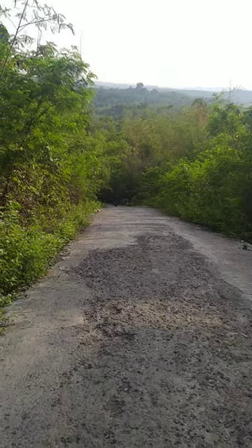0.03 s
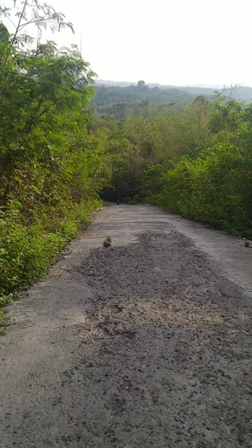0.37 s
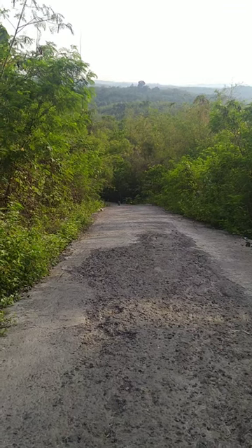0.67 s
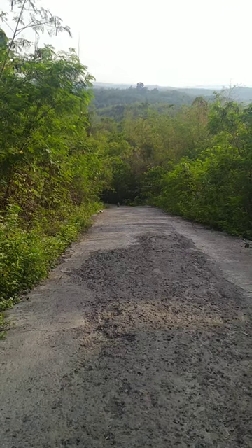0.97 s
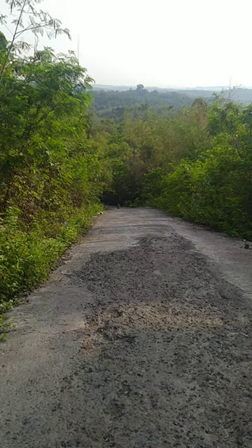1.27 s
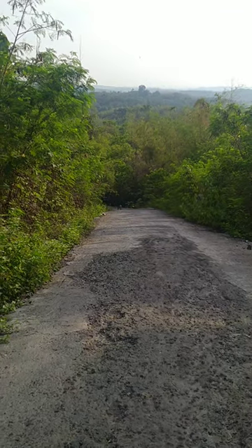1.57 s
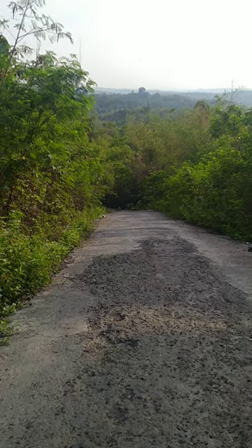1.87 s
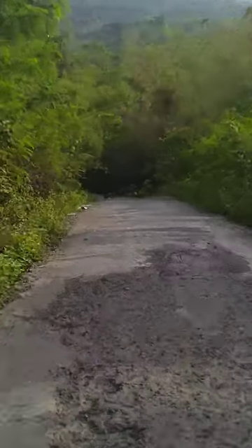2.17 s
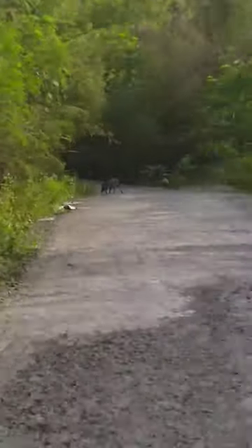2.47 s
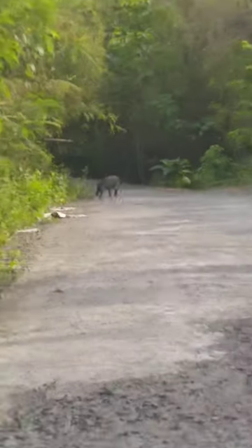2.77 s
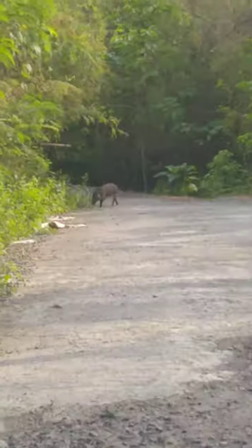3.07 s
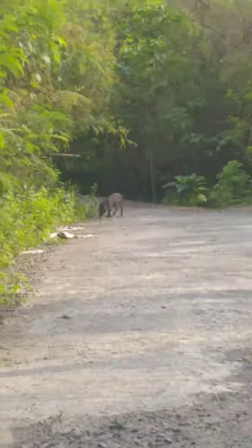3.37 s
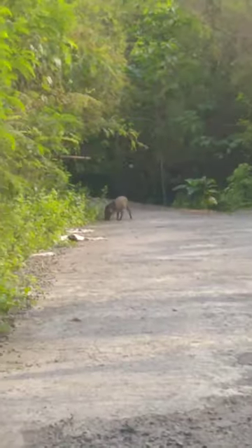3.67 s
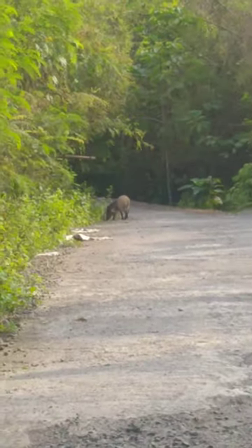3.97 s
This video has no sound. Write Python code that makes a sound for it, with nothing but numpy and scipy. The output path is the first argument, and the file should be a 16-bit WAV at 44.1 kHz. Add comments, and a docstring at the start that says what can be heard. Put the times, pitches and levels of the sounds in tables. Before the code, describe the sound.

Insects trill and small birds chirp over a low engine throb, with a few handling knocks.

```python
"""Insects and birds on a country lane

Insects trill with quick wing strokes, small birds chirp and whistle, and bushes and trees echo them.
A muffled low throb, probably an idling engine, runs underneath, with a soft hiss of distant air.
Fingers knock on the phone and make its case ring, rub it lightly and slide over it near the end."""
import sys
import numpy as np
from scipy import signal
from scipy.fft import rfft, irfft
from scipy.io import wavfile

SR = 44100
rng = np.random.default_rng(int(sys.argv[2]) if len(sys.argv) > 2 else 0)


def wav_out(sig):
    """Save sig, one row per channel (or a flat mono array), as 16-bit PCM at SR to the path in sys.argv[1]."""
    wavfile.write(sys.argv[1], SR, np.round(np.clip(np.atleast_2d(sig).T, -1, 1) * 32767).astype(np.int16))


N = 176400  # 4 seconds

# runs of insect wing strokes: start_s, end_s, period_s, pitch_hz, stroke_s, fall_hz, level_db
TRILLS = [(0.199, .71, .0778, 5660, 0.023, 320, -50.5), (0.898, 1.1, .0768, 5690, 0.033, 320, -50.5),
          (1.138, 1.64, 0.072, 5650, 0.032, 324, -57.5), (1.911, 2.5, 0.073, 5645, 0.028, 317, -57),
          (2.606, 2.96, .076, 5640, 0.031, 316, -53.5), (3.15, 3.8, 0.077, 5650, 0.022, 320, -52.5),
          (0.051, .56, .08, 5510, 0.059, 60, -62), (0.608, 1.32, .0803, 5458, 0.054, 25, -52),
          (1.335, 1.62, .0803, 5450, 0.068, 70, -64), (1.65, 2.36, .0803, 5445, 0.047, 25, -52),
          (2.694, 3.48, .0805, 5442, 0.047, 25, -54), (3.82, 4, 0.087, 5520, 0.037, 60, -56),
          (1.926, 2.42, 0.074, 6470, .014, 200, -59.5), (2.631, 2.96, 0.059, 6540, 0.015, 200, -62)]
# high bird chirps: middle_s, pitch_hz, level_db
CHIRPS = [(0.027, 4400, -54), (0.146, 4300, -56), (0.274, 4410, -50.5), (.307, 4640, -53.5),
          (0.469, 4500, -55), (0.531, 4320, -49), (.581, 4325, -54), (0.638, 4230, -55.5),
          (.725, 4370, -54), (1.005, 4310, -54), (1.116, 4280, -53.5), (1.146, 4730, -49.5),
          (1.25, 4700, -52.5), (1.28, 4500, -51), (1.368, 4560, -53), (1.399, 4500, -52),
          (1.543, 4320, -53.5), (1.58, 4500, -49.5), (1.827, 4420, -52), (1.889, 4520, -53),
          (1.954, 4327, -53), (2.08, 4286, -64), (2.231, 4287, -54), (2.333, 4490, -49.5),
          (2.392, 4500, -57), (2.534, 4380, -54), (2.643, 4250, -50.5), (2.718, 4750, -51.5),
          (3.026, 4500, -56.5), (3.061, 4300, -54.5), (3.13, 4200, -59), (3.187, 4320, -56.5),
          (3.251, 4300, -57), (3.272, 4320, -55), (3.374, 4400, -54), (3.392, 4555, -49.5),
          (3.488, 4540, -47), (3.603, 4514, -62), (3.725, 4474, -56), (3.767, 4350, -50),
          (3.882, 4450, -56)]
# bird calls that slide down: start_s, first_pitch_hz, level_db
SLIDING_CALLS = [(0, 3950, -56), (.400, 4350, -43.5), (0.861, 3950, -49.5), (1.86, 3955, -53),
                 (2.206, 3880, -49), (3.589, 3946, -46), (3.912, 4180, -47)]
# bird whistles: start_s, length_s, first_pitch_hz, middle_pitch_hz, last_pitch_hz, level_db
WHISTLES = [(-.06, 0.27, 1900, 2202, 2350, -49.5), (0.208, .09, 2370, 2280, 2030, -50),
            (0.544, .24, 1816, 2150, 1950, -51.5), (0.816, 0.14, 1950, 2020, 1950, -58.5),
            (0.979, .1, 1980, 1970, 1900, -61), (2.293, 0.119, 2920, 3080, 2890, -59.5),
            (2.921, 0.21, 2360, 2754, 2761, -58), (3.879, 0.18, 2520, 2410, 2728, -54.5)]
# the engine's tones at 3 and 4 times its firing rate: time_s, firing_hz, third_db, fourth_db
ENGINE_IDLE = [(0.0, 39.7, -39, -38), (0.15, 40.77, -37, -36.5), (0.91, 40.82, -36, -38.5),
               (1.37, 40.52, -37, -33.5), (1.67, 42.13, -38, -40.5), (1.97, 40.29, -34, -34),
               (2.14, 40.92, -40, -33), (2.41, 41.18, -33, -37.5), (2.51, 41.84, -36.5, -34),
               (2.63, 42.15, -33.5, -33.5), (2.74, 41.06, -32, -36.5), (2.99, 40.43, -37, -34),
               (3.16, 40.96, -32.5, -33.5), (3.31, 40.45, -31.5, -39), (3.5, 41.3, -33, -29),
               (3.7, 40.7, -30, -37), (3.89, 41.44, -33, -37), (4.0, 41.7, -33, -34)]
# its weaker tones, set against the average of those two: multiple, relative_db
ENGINE_WEAK_TONES = [(1, -37), (2, -11.5), (5, -17), (6, -32), (7, -32), (8, -33.5)]
# tone colour of the low rumble: frequency_hz, relative_db
RUMBLE_COLOUR = [(20, -48), (48, -26), (62, -23.5), (76, -5), (100, -2.5), (150, 0), (200, -3), (250, -16),
                 (320, -18), (420, -32), (800, -51)]
# loudness of the rumble: time_s, level_db
RUMBLE_LEVEL = [(0, -39.5), (2, -39), (3.3, -36), (3.6, -36), (4, -35.5)]
# finger knocks, with a level for each part of the sound: time_s, thump_db, body_db, tap_db,
# tick_db, hollow_db
KNOCKS = [(.1462, -48, -34, -54, -60, -70), (.2432, -51, -24, -47, -62, -60),
          (.2495, -18.5, -39, -50, -62, -33.5), (0.3116, -15.5, -35.5, -62, -60, -57),
          (.361, -52, -55, -63, -56, -37), (0.5162, -33, -23.5, -28.5, -27.5, -55),
          (.6016, -51, -23, -40, -57, -58), (.6056, -11.5, -38, -58, -66, -55),
          (1.4883, -42, -28, -25.5, -34.5, -68), (1.7393, -50, -30.5, -33.5, -53, -70)]
# the tones the case rings with, for each part: pitch_hz, fade_s (to fall 60 dB), rise_s, relative_db
CASE_TONES = {"thump": [(193, .018, .0011, 5.5), (269, 0.023, 0.0019, -7)],
              "body": [(758.5, 0.014, 0.00078, 1.5), (1113, 0.015, 0.00073, -0.5)],
              "tap": [(1450, 0.013, 0.00057, -0.5), (1950, 0.017, 0.00087, -0.5),
              (2220, 0.016, 0.00033, -7.5)], "tick": [(6600, 0.017, 0.00017, -5),
              (7700, 0.006, 0.00012, -6.5), (10900, 0.0036, 0.000085, 1), (11960, 0.0088, 0.000072, 3)],
              "hollow": [(290, .08, 0.0034, 4.5), (987, 0.06, 0.0017, -4), (1465, 0.038, .003, -11.5)]}
# small shifts of the grip: time_s, relative_db
GRIP_TICKS = [(0.087, -44), (0.3374, -40), (0.412, -37), (0.4344, -46), (0.4554, -42), (0.498, -33),
              (0.814, -44), (1.5352, -45), (1.6034, -37), (2.707, -37)]
# tone colour of skin on the case: frequency_hz, relative_db
SKIN_COLOUR = [(150, -10), (400, 0.5), (800, 2.5), (1300, 0), (2200, -2.5), (3000, -9.5), (4000, -11.5),
               (5000, -24), (6000, -6), (6900, -3.5), (8000, -11), (10000, -12), (11500, -8), (12600, -0.5),
               (14000, -4)]
# loudness of the rubbing: time_s, level_db
RUB_LEVEL = [(0, -62), (.2, -56.5), (.45, -54.5), (.6, -58.5), (.76, -49.5), (.92, -55.5), (1.25, -49.5),
             (1.45, -51), (1.62, -54), (1.7, -59), (2.4, -64), (3.33, -70), (3.43, -49.5), (3.51, -42),
             (3.67, -42.5), (3.76, -39), (3.805, -54), (3.88, -49.5), (4, -53.5)]
# tone colour of distant air and far insects: frequency_hz, relative_db
AIR_COLOUR = [(200, -14), (400, 2.5), (620, 6), (900, -0.5), (1400, -2.5), (2100, -8), (2900, -11.5),
              (3300, -39), (3800, -15), (4400, -16), (5000, -15.5), (5550, -5.5), (6000, -21), (6600, -18),
              (8000, -40), (10000, -21), (11500, -12.5), (12800, -8), (14000, -17)]


def insect_trills():
    """Insect wings make runs of evenly spaced strokes, each a short tone that sags in pitch."""
    overtone_hz, overtone_width_hz = 11220, 200  # the wing's overtone rings only near this pitch
    out = np.zeros(N)
    for start, end, period, hz, length, fall_hz, db in TRILLS:
        u = progress(length)
        pitch = hz + fall_hz * (.5 - u)
        overtone = gain(-5) * np.exp(-((2 * pitch - overtone_hz) / overtone_width_hz) ** 2)
        for at in np.arange(start, end, period):
            swell = gain(db + rng.standard_normal()) * np.sin(np.pi * u)
            add(out, at, swell * (tone(pitch) + overtone * tone(2 * pitch)))
    return tree_echo(flutter(out, depth=.4, rate_hz=126), echo_db=-11)


def bird_chirps():
    """Small birds give quick falling chirps, no two alike, with a faint twitter behind them."""
    typical_s, typical_fall_hz, variety = .042, 800, .22
    twitter_hz, spread_hz, twitter_db = 4500, 226, -59.5
    twitter = [(when * N / SR, twitter_hz + spread_hz * (2 * height - 1), twitter_db)
               for when, height in rng.random(size=(36, 2))]
    out = np.zeros(N)
    for middle, hz, db in CHIRPS + twitter:
        stretch, slope = np.exp(variety * rng.standard_normal(2))
        length = typical_s * stretch
        u = progress(length)
        pitch = hz + typical_fall_hz * slope * (.5 - u)
        add(out, middle - length / 2, gain(db) * np.sin(np.pi * u) ** 1.54 * tone(pitch))
    return tree_echo(flutter(out, depth=.47, rate_hz=130), echo_db=-6)


def bird_slides():
    """A nearer bird's call slides steeply down, then flattens and fades."""
    length_s, fall_s, floor_hz = .088, .042, 1900
    out, u = np.zeros(N), progress(length_s)
    swell = np.sin(np.pi * u ** .57) ** 2  # peaks early
    for at, hz, db in SLIDING_CALLS:
        pitch = floor_hz + (hz - floor_hz) * np.exp(-u * length_s / fall_s)
        add(out, at, gain(db) * swell * tone(pitch))
    return tree_echo(flutter(out, depth=.67, rate_hz=97), echo_db=-5.5)


def bird_whistles():
    """Far birds whistle slow, pure notes that bend in pitch."""
    out = np.zeros(N)
    for at, length, first_hz, middle_hz, last_hz, db in WHISTLES:
        u = progress(length)
        arch = np.sin(np.pi * u)
        bend_hz = middle_hz - (first_hz + last_hz) / 2
        pitch = first_hz + (last_hz - first_hz) * u + bend_hz * arch
        add(out, at, gain(db) * arch * tone(pitch))
    return tree_echo(flutter(out, depth=.18, rate_hz=46), echo_db=-8.5)


def idling_engine():
    """Muffled firings: low tones at multiples of the firing rate throb together over a rumble."""
    rate_wobble, boost_db, waver_db = .0075, .89, .17
    firing_hz = curve(ENGINE_IDLE) * (1 + rate_wobble * wander(10.5))
    phase = 2 * np.pi * np.cumsum(firing_hz) / SR
    third_db, fourth_db = curve(ENGINE_IDLE, column=2), curve(ENGINE_IDLE, column=3)
    tones = [(3, third_db), (4, fourth_db)]
    tones += [(multiple, (third_db + fourth_db) / 2 + db) for multiple, db in ENGINE_WEAK_TONES]
    hum = np.zeros(N)
    for multiple, db in tones:
        level = np.sqrt(2) * gain(db + boost_db + waver_db * wander(10))
        hum += level * np.cos(multiple * phase + 2 * np.pi * rng.random())
    hum *= 1 + .1 * np.cos(phase / 4) + .035 * np.cos(phase / 2)  # uneven every four and two firings
    rumble = gain(curve(RUMBLE_LEVEL)) * colour(rng.standard_normal(N), RUMBLE_COLOUR)
    return hum + rumble


def finger_knocks():
    """Fingers knock on the case and make it ring: soft knocks thump, hard ones tick."""
    grit, contact_s, low_cut_hz = .05, .0017, 108
    out, t = np.zeros(N), np.arange(SR // 10) / SR
    for at, *part_levels in KNOCKS:
        push = grit * rng.standard_normal(len(t)) * np.exp(-t / contact_s)
        push[0] += 1  # one sharp hit ahead of the grit
        for (part, tones), level_db in zip(CASE_TONES.items(), part_levels):
            ring = np.zeros(len(t))
            for hz, fade_s, rise_s, db in tones:
                rise = (1 - np.exp(-t / rise_s)) ** 2
                ring += gain(db) * np.sin(2 * np.pi * hz * t) * rise * fade(t, fade_s)
            if part != "thump":
                ring = signal.fftconvolve(ring, push)
            add(out, at, -gain(level_db) * ring)
    return signal.sosfilt(signal.butter(2, low_cut_hz, "highpass", fs=SR, output="sos"), out)


def grip_ticks():
    """The grip shifts, and skin makes tiny dry ticks on the case."""
    base_db, decay_s = -5, .00092
    level, t = np.zeros(N), np.arange(SR // 50) / SR
    for at, db in GRIP_TICKS:
        add(level, at, gain(base_db + db) * np.exp(-t / decay_s))
    return level * colour(rng.standard_normal(N), SKIN_COLOUR)


def finger_rubbing():
    """Skin slides on the case: a hiss with tiny catches."""
    catches_per_s, scatter_db, catch_db, flicker_db = 110, 2.5, -8.5, 1.5
    catches = (rng.random(N) < catches_per_s / SR) * rng.choice([-1, 1], N)
    catches = catches * gain(scatter_db * np.minimum(rng.exponential(1, N), 4))
    friction = rng.standard_normal(N) + gain(catch_db) * catches / catches.std()
    return colour(friction, SKIN_COLOUR) * gain(curve(RUB_LEVEL) + flicker_db * wander(17))


def distant_air():
    """The countryside hisses and gently wavers, and far insects blend into one thin ring."""
    ring_hz, ring_width_hz, ring_db, air_db = 5444, 21, -68.5, -54
    phase = 2 * np.pi * ring_hz * np.arange(N) / SR
    ring = wander(ring_width_hz) * np.cos(phase) + wander(ring_width_hz) * np.sin(phase)
    hiss = colour(rng.standard_normal(N), AIR_COLOUR) * gain(air_db + wander(4.1))
    return hiss + gain(ring_db) * ring


def tree_echo(x, echo_db):
    """A sound, plus a soft wash of echo from the leaves and four quick bounces off the bushes."""
    fade_s, rise_s, bounce_db = .87, .0047, -8
    t = np.arange(SR) / SR
    echo = rng.standard_normal(SR) * fade(t, fade_s) * (1 - np.exp(-(t / rise_s) ** 2))
    echo *= gain(echo_db) / np.linalg.norm(echo)
    for delay_s in rng.uniform(.003, .028, 4):
        add(echo, delay_s, [gain(echo_db + bounce_db)])
    return x + signal.fftconvolve(x, echo)[:N]


def flutter(x, depth, rate_hz):
    """Shake a sound's level and phase, as if it came through leaves."""
    shake = 1 + depth * (wander(rate_hz) + 1j * wander(rate_hz))
    return (signal.hilbert(x) * shake).real / np.sqrt(1 + 2 * depth ** 2)


def gain(db):
    """Turn decibels into a number to multiply by."""
    return 10 ** (np.asarray(db) / 20)


def fade(t, fade_s):
    """Die away by 60 dB every fade_s seconds."""
    return np.exp(-np.log(1000) * t / fade_s)


def curve(rows, column=1):
    """One column of a table, joined by straight lines in time."""
    rows = np.array(rows, float)
    return np.interp(np.arange(N) / SR, rows[:, 0], rows[:, column])


def wander(rate_hz):
    """Smooth random motion of typical size 1, mostly slower than rate_hz."""
    hz = np.arange(N // 2 + 1) * SR / N
    motion = irfft(rfft(rng.standard_normal(N)) * np.exp(-(hz / rate_hz) ** 2 / 2), N)
    return motion / motion.std()


def colour(x, points):
    """Shape a sound's lows and highs with a tone colour table, then scale it to a typical size of 1."""
    hz, db = np.array(points, float).T
    all_hz = np.maximum(np.arange(N // 2 + 1) * SR / N, 1)
    shaped = irfft(rfft(x) * gain(np.interp(np.log(all_hz), np.log(hz), db)), N)
    return shaped / shaped.std()


def add(out, start_s, x):
    """Mix a short sound in at a given time."""
    offset = int(round(start_s * SR))
    first, last = max(offset, 0), min(offset + len(x), N)
    if last > first:
        out[first:last] += x[first - offset:last - offset]


def progress(length_s):
    """A ramp from 0 to 1 through a note, called u above."""
    return np.linspace(0, 1, max(int(length_s * SR), 2))


def tone(hz):
    """A pure tone that follows a pitch curve."""
    return np.sin(2 * np.pi * (np.cumsum(hz) / SR + rng.random()))


def scene():
    """Everything heard at the phone, in one channel."""
    lane = idling_engine() + insect_trills() + bird_chirps() + bird_slides() + bird_whistles()
    fingers = finger_knocks() + grip_ticks() + finger_rubbing()
    return (lane + fingers + distant_air())[None]


def record(dry):
    """The phone steeply cuts the highest treble."""
    top_hz = 13250
    return signal.sosfilt(signal.ellip(12, .2, 80, top_hz, fs=SR, output="sos"), dry)


dry = scene()
out = record(dry)
wav_out(out)
```